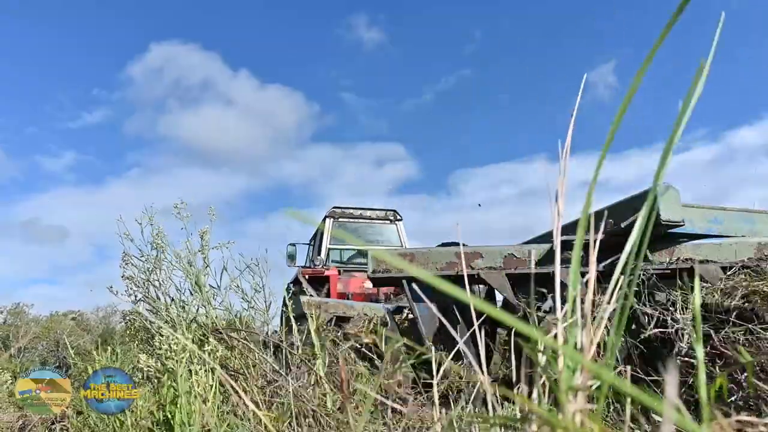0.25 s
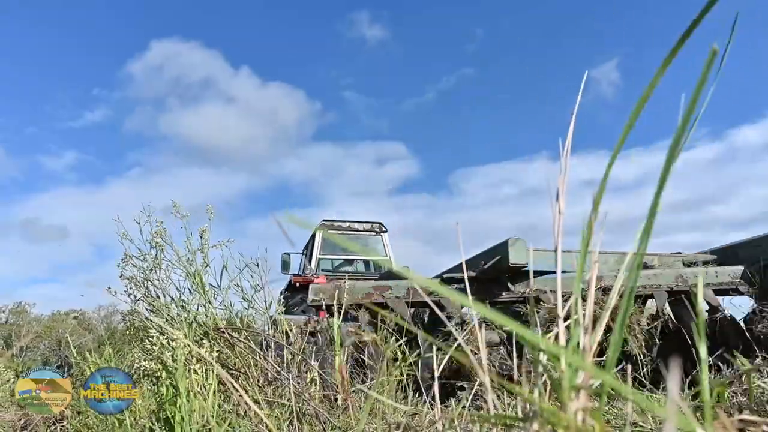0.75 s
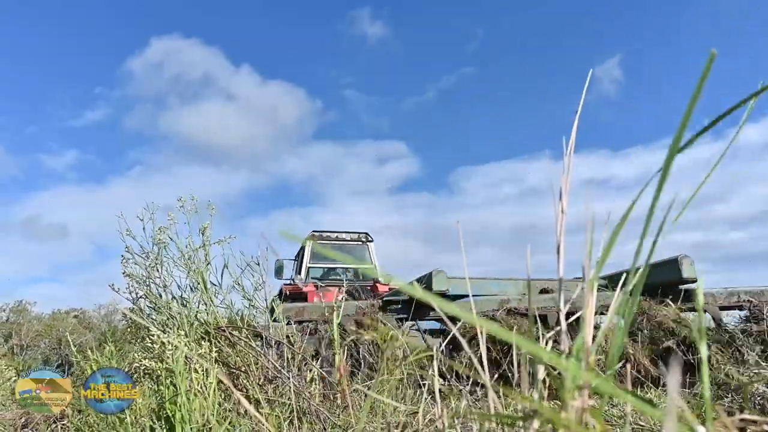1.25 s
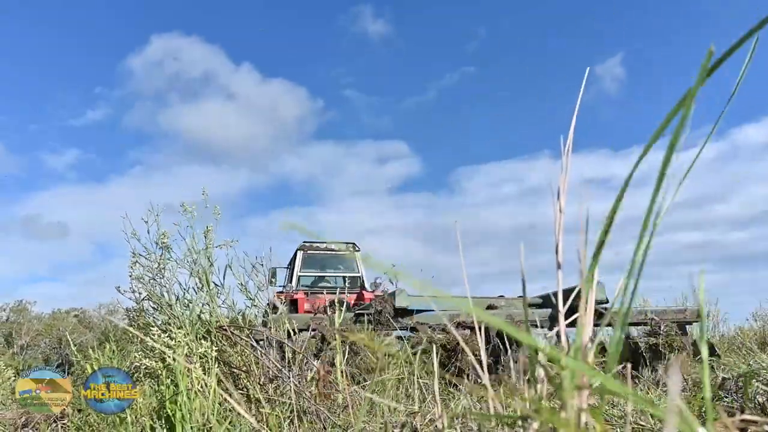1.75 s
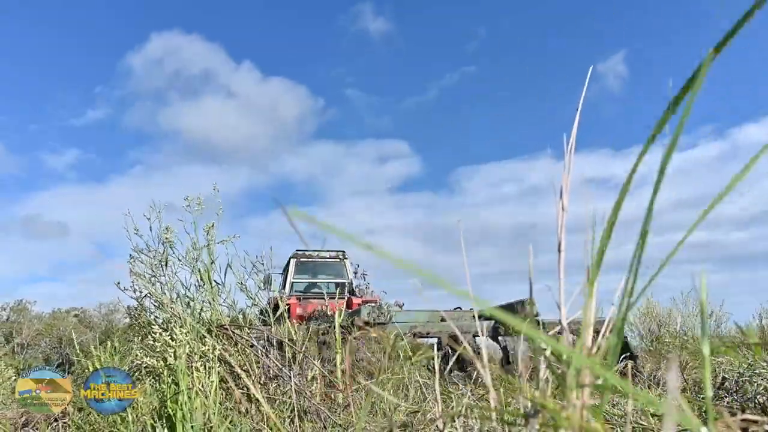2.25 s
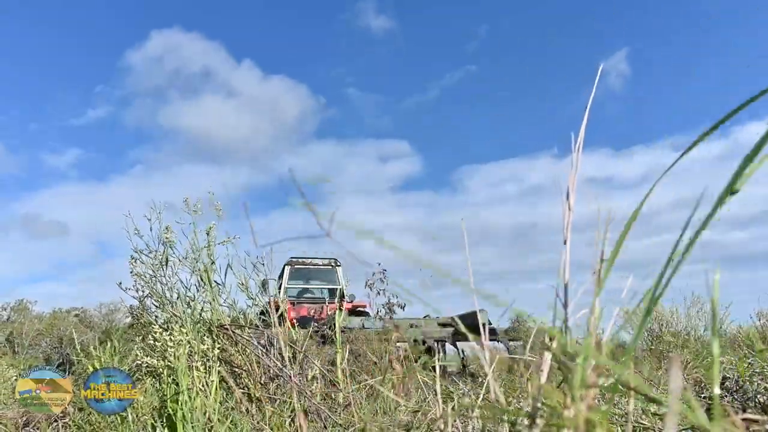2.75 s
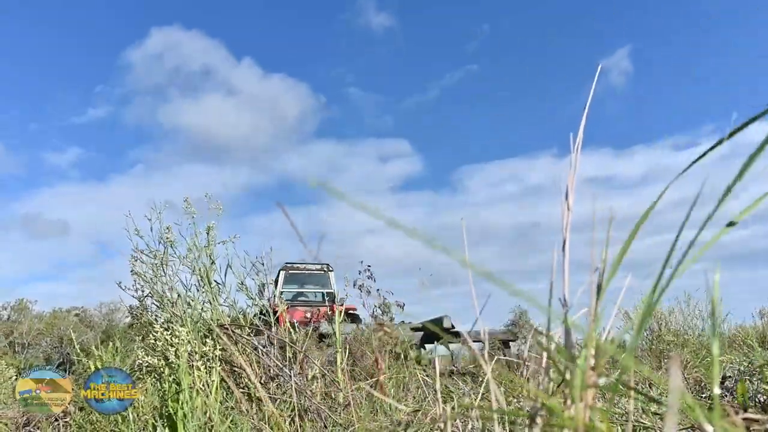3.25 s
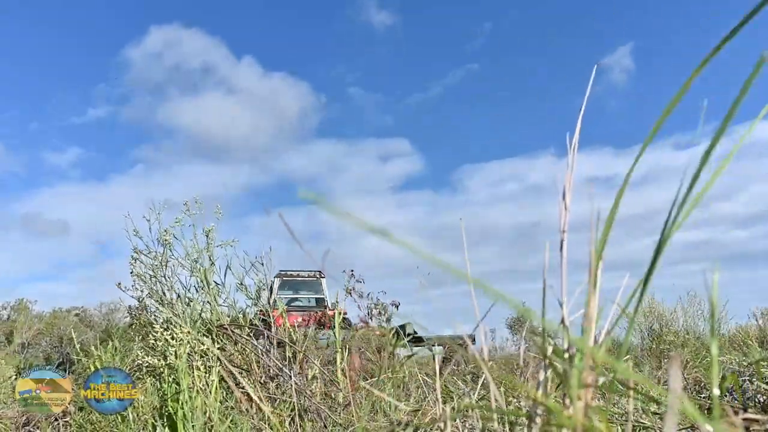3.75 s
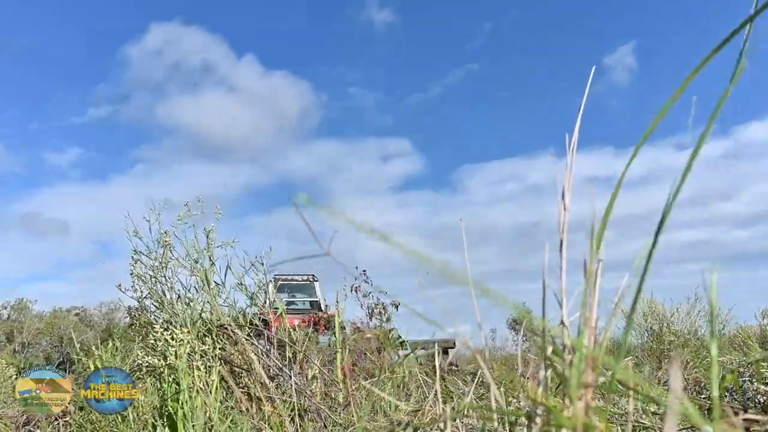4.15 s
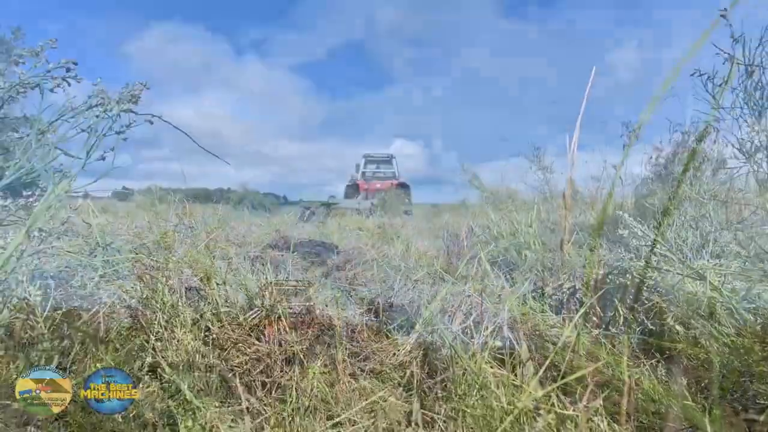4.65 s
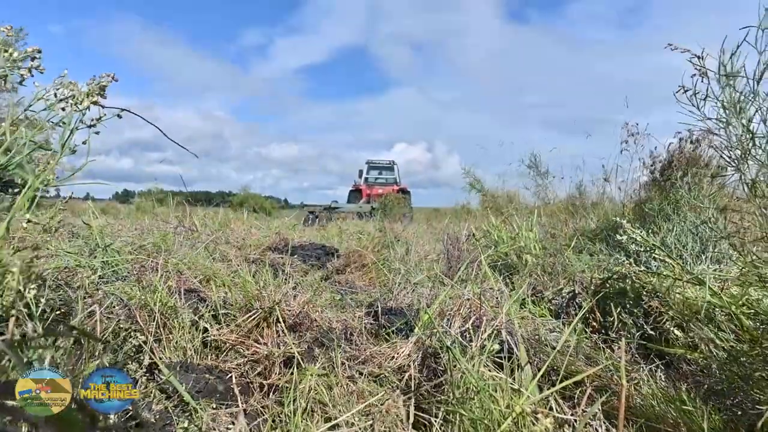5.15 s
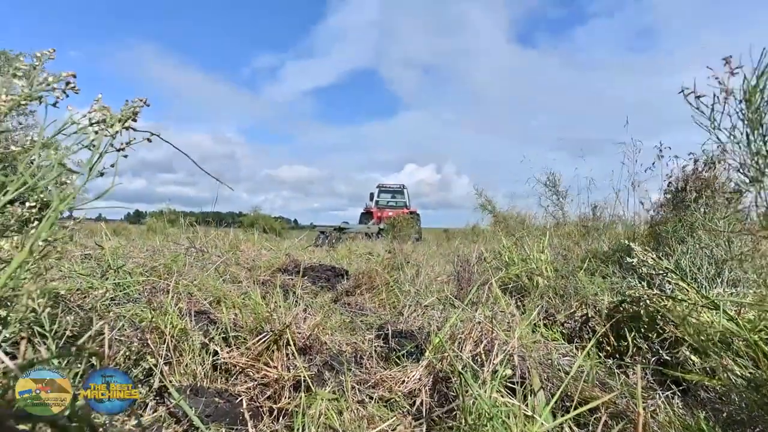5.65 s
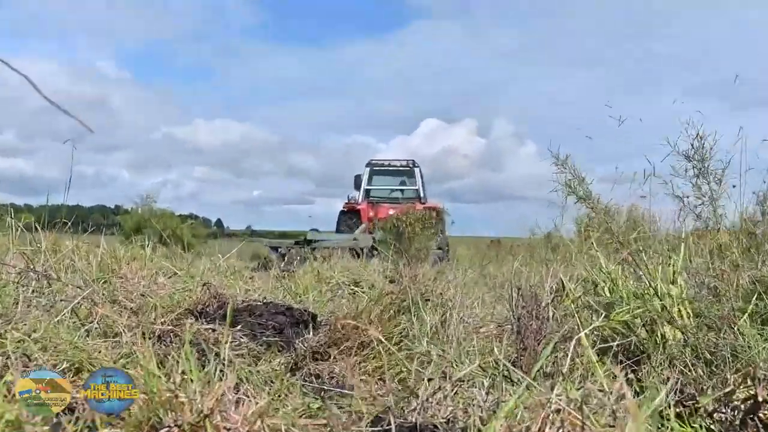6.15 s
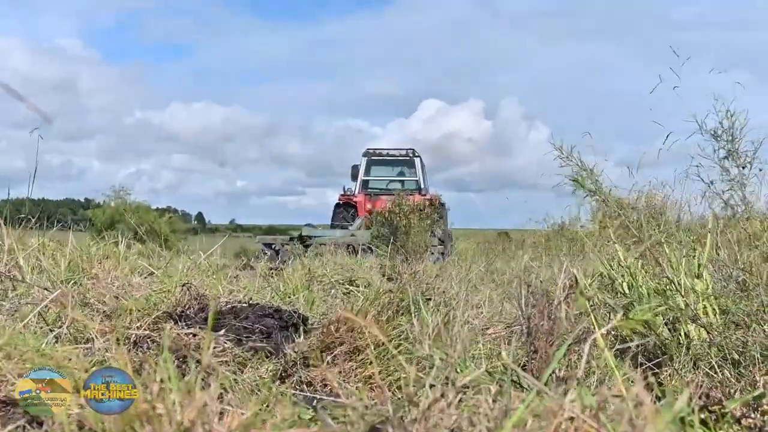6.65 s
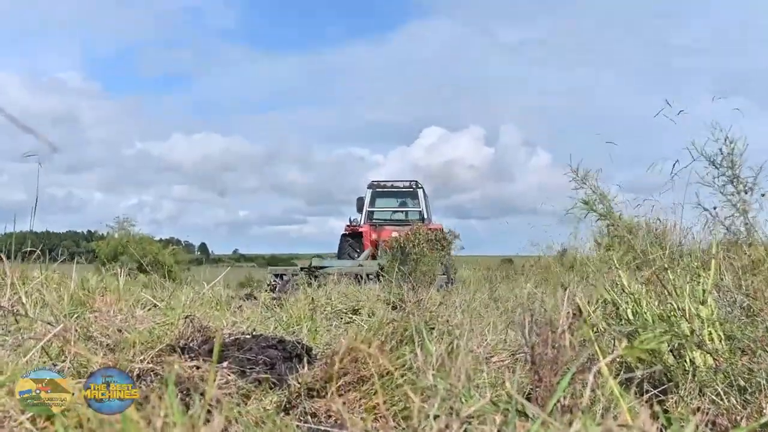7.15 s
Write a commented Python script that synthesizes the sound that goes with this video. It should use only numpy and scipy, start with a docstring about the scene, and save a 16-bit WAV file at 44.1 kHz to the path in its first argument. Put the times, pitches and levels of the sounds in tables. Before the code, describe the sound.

A diesel tractor drones away through a field, its disc harrow crunching soil and stalks, then is heard knocking faintly farther off amid wind buffets.

```python
"""A rough, grassy field: a six-cylinder diesel tractor drags a disc harrow away from the microphones.
Engine tones drone, shaped noise clatters at each firing; random cracks make discs crunch soil and dry stalks.
Struck stones, snapping stalks and bright engine pings ring briefly; then it fades and cuts to a second scene.
It fades back in far off and facing us: crisp knocks flicker, dry grass hisses and
short low noise bursts buffet the microphones."""
import sys
import numpy as np
from scipy import signal
from scipy.fft import rfft, irfft, next_fast_len
from scipy.io import wavfile
from scipy.ndimage import uniform_filter1d, map_coordinates

SR = 44100
rng = np.random.default_rng(int(sys.argv[2]) if len(sys.argv) > 2 else 0)


def wrap_up_sound(samples):
    """Save the sound to the file named by the first command line argument, as 16-bit audio."""
    columns = np.atleast_2d(samples).T
    # keep every value between -1 and 1, then stretch to whole-number steps
    tamed = np.clip(columns, -1, 1)
    steps = np.round(tamed * 32767).astype(np.int16)
    wavfile.write(sys.argv[1], SR, steps)


N = 327222
T = np.arange(N) / SR

# Engine speed before its slight jitter: (time [s], firing rate [Hz])
ENGINE_SPEED = [(0.0, 91.84), (0.5, 90.4), (0.8, 90.6), (1.05, 91.55), (1.4, 90.86), (1.9, 90.1),
                (2.2, 91.47), (2.9, 90.1), (3.45, 90.17), (3.75, 91.33), (4.1, 90.8), (4.5, 90.77),
                (5.4, 90.08), (5.75, 91.93), (6.1, 92.84), (6.5, 91.05), (6.9, 89.8), (7.3, 91.57)]
# Exhaust lines, relative to the drone: (multiple of the six-firing cycle [1], rear [dB], front [dB])
EXHAUST_LINES = [(3, -33, -25), (4, -24, -21), (5, -29, -14), (6, -1, 1), (9, -24, -20), (11, -28.5, -18.5),
                 (12, -26.5, -12.5), (14, -26, -23), (15, -31.5, -25.5), (18, -29.5, -30)]
# Swells of the firing note's octave, from the front: (time [s], lift [dB])
OCTAVE_SWELL = [(5.0, 2), (5.35, -0.5), (5.6, 1.5), (6.28, -19), (6.4, 7.5), (6.5, -0.5), (6.65, 1),
                (7.05, -8), (7.2, 1)]
# Thin whine before its waver: (time [s], pitch [Hz], level [dB])
WHINE_TRACK = [(0.0, 937, -54), (0.09, 935, -52.5), (0.18, 920, -63), (0.72, 919, -64.5),
               (0.98, 928, -58.5), (1.14, 927, -58), (1.24, 919, -66), (2.3, 918, -63.5), (2.9, 917, -69)]
# Injector ring from the front, before its scatter: (time [s], pitch [Hz])
RING_PITCH_TRACK = [(5.0, 3134), (5.45, 3088), (5.85, 2960), (6.2, 3015), (6.55, 3253), (6.95, 3005)]
# Gear mesh tones, relative to the drone: (multiple of the firing rate [1], rear [dB], front [dB])
GEAR_TONES = [(2.8, -22.5, -24.5), (5.06, -35.5, -38), (6.7, -29, -33)]
# Knock of each cylinder in turn, before scatter: (level [dB])
CYLINDER_KNOCK_DB = [4.5, 3, 2.5, 3.5, 4.5, 1]
# Swells of engine treble carried by moving air:
# (time [s], half length [s], lift of the ring [dB], lift of the hiss [dB])
TREBLE_SWELLS = [(2.08, 0.17, 4, 3.5), (2.643, 0.03, -3, 8), (2.872, 0.37, 4.5, 2.5), (3.886, 0.1, -9, -9),
                 (4.126, 0.065, 3.5, -3), (4.282, 0.073, -1, 10), (4.46, 0.14, 9, -11),
                 (4.897, 0.11, 3, 14.5), (5.204, 0.087, 1.5, 2.5), (5.384, 0.12, 2.5, -0.5),
                 (5.616, 0.12, -1, 7.5), (5.791, 0.15, 3.5, 8.5), (6.196, 0.26, -5.5, -10),
                 (6.418, 0.11, 1, 9.5), (6.56, 0.06, 2, 2), (6.72, 0.051, -8, 6), (6.87, 0.097, 5.5, 15),
                 (7.2, 0.044, -1, 11)]
# Short bright pings, mostly near 3 kHz, probably single strong engine knocks and injector rings:
# (time [s], nominal level [dB], pitch [Hz])
ENGINE_PINGS = [(0.08, -38, 1816), (0.717, -37, 2070), (2.742, -46, 3308), (2.83, -46, 3240),
                (2.875, -50, 3150), (2.885, -51, 3030), (2.897, -49, 3050), (2.954, -49, 2950),
                (2.964, -45, 3260), (3.008, -45, 3320), (4.133, -48.5, 3060), (5.18, -43.5, 3020),
                (5.367, -43, 3100), (6.155, -48, 3020), (6.56, -49, 3200)]

# Spectrum shape of the exhaust rumble: (frequency [Hz], relative level per Hz [dB])
RUMBLE_SPECTRUM = [(20, -14), (38, -18), (60, -5.5), (130, 2.5), (200, -2), (260, -8.5), (320, -11),
                   (500, -15), (900, -53.5)]
# Spectrum shape of the clatter from behind: (frequency [Hz], relative level per Hz [dB])
CLATTER_REAR_SPECTRUM = [(250, -17), (400, -6), (620, 5), (780, 4.5), (1050, -7), (1380, -0.5),
                         (1550, -13.5), (1800, 0), (2150, -4), (2290, -9), (2430, -4), (2600, -6),
                         (3400, -8.5), (4200, -14), (5300, -18), (8000, -23), (15000, -55)]
# Spectrum shape of the clatter from the front: (frequency [Hz], relative level per Hz [dB])
CLATTER_FRONT_SPECTRUM = [(300, -28.5), (500, -14.5), (650, 0), (830, 0.5), (950, -1), (1170, 2.5),
                          (1500, -13), (1900, -3), (2400, -12), (4200, -27.5), (7500, -45), (10000, -34.5),
                          (15000, -51)]
# Spectrum shape of discs in soil and stalks: (frequency [Hz], relative level per Hz [dB])
SOIL_SPECTRUM = [(150, -31), (300, -15.5), (420, -1.5), (530, -6.5), (700, -4), (1000, -2), (1500, -1),
                 (2100, -0.5), (3300, -3), (4300, -8), (7000, -16.5), (10000, -21), (12500, -21),
                 (15500, -20)]
# Spectrum shape of wind on the microphones: (frequency [Hz], relative level per Hz [dB])
GUST_SPECTRUM = [(20, 1), (45, 9), (120, 3.5), (250, 1.5), (380, -4.5), (520, -9), (750, -17.5),
                 (1500, -41), (6000, -80)]
# Spectrum shape of dry grass: (frequency [Hz], relative level per Hz [dB])
GRASS_SPECTRUM = [(500, -8), (2500, 11), (5000, 0.5), (9000, -12.5), (12500, -16), (15500, -14)]

# Resonances of harrow frame and discs: (centre [Hz], width [Hz], relative level [dB])
FRAME_MODES = [(520, 210, 5.5), (1430, 70, -1), (1780, 90, -2.5), (2110, 63, 3)]
# Harrow steel when struck: (mode [Hz], relative level before scatter [dB])
STEEL_RINGS = [(1217, 2.5), (1780, -4), (2090, -4), (2440, -1), (2840, -1.5), (3390, -2), (4000, 0),
               (4920, 4)]
# Stones clanking on the discs: (time [s], peak level [dB], pitch that rings most [Hz])
STONE_CLANKS = [(1.9207, -31, 1910), (2.781, -34.5, 3200), (3.142, -40, 1750), (3.2315, -38, 1600),
                (3.5937, -39.5, 2440)]
# Stalks snapping and stones ticking, before lift and panning: (time [s], peak level [dB], centre [Hz])
STALK_SNAPS = [(0.1444, -37, 2960), (0.804, -35.5, 2160), (1.0794, -47, 5000), (1.5476, -37, 3380),
               (2.1143, -43, 3420)]
# Buffets on the microphones: (time [s], level at the peak [dB], half length [s], centre [Hz])
WIND_BUFFETS = [(2.84, -42.5, 0.04, 190), (4.964, -58, 0.01, 230), (5.065, -48.5, 0.059, 220),
                (5.163, -39.5, 0.016, 201), (5.214, -41, 0.007, 352), (5.24, -44, 0.007, 280),
                (5.316, -45.5, 0.012, 180), (5.711, -40, 0.022, 260), (5.766, -37.5, 0.015, 260),
                (5.808, -37.5, 0.022, 290), (5.916, -36.5, 0.0086, 170), (5.971, -38.5, 0.0059, 240),
                (5.995, -37, 0.008, 350), (6.05, -37, 0.008, 250), (6.116, -42.5, 0.0087, 230),
                (6.143, -40, 0.0048, 320), (6.182, -39, 0.0055, 190), (6.214, -44, 0.015, 340),
                (7.07, -49, 0.0048, 280), (7.155, -48, 0.011, 160), (7.17, -45, 0.005, 210),
                (7.176, -50, 0.0032, 450), (7.191, -47.5, 0.008, 191), (7.23, -47.5, 0.0076, 250),
                (7.293, -45, 0.002, 520), (7.33, -48, 0.007, 170)]

# The machine sinks towards the cut to the far, front view and comes back after it
CUT_S, FADE_OUT_S, FADE_IN_S, FADE_DB = 4.75, 0.53, 0.42, -15
# Driving away, and distances from the microphones at the start
DRIVE_M_S, ENGINE_M, HARROW_M = 1.36, 10.1, 1.77
# Levels from behind at the start, before wavers and lifts
REAR_DRONE_DB, REAR_CLATTER_DB, REAR_RING_DB, REAR_HISS_DB, HARROW_DB = -31.5, -51.5, -57.5, -62, -42.5
UNMASK_DB_PER_S = 0.53  # the harrow's frame shields the engine's clatter less and less
# Levels from the front, before wavers and lifts
FRONT_DRONE_DB, FRONT_CLATTER_DB, FRONT_RING_DB, FRONT_HISS_DB, GRASS_DB = -40.5, -50, -55.5, -67, -58.5
# The far clatter rises to a rounded peak and sinks away
LOUDEST_S, ARC_DB_PER_S2 = 5.28, 2
REAR_RUMBLE_DB, FRONT_RUMBLE_DB = -14.5, -16.5  # relative to the drone
KNOCK_SCATTER_DB = 1.4
TOP_HZ = 15800


def exhaust(cycle, front):
    """The firing note and octave, with weak lines from unequal cylinders, over rumble that puffs at firings."""
    out = 0
    for order, rear_db, front_db in EXHAUST_LINES:
        waver_db = 0.45 * walk(22) if order == 6 else 2.4 * walk(12)
        drift_turns = 0 if order % 6 == 0 else 0.06 * walk(10)
        line = np.sin(2 * np.pi * (order * cycle + drift_turns + rng.random()))
        swell_db = curves(OCTAVE_SWELL)[0] if order == 12 else 0
        level_db = np.where(front, front_db + swell_db, rear_db) + waver_db
        out = out + np.sqrt(2) * line * undb(level_db)
    puffs = rng.standard_normal(N) * knocks(cycle, decay_strokes=0.25, steady=0.95)
    rumble = colour(puffs, RUMBLE_SPECTRUM)
    return out + rumble * undb(np.where(front, FRONT_RUMBLE_DB, REAR_RUMBLE_DB))


def gears(cycle, front):
    """Meshing teeth sing at fixed multiples of the engine speed, unsteady from backlash."""
    firing = len(CYLINDER_KNOCK_DB) * cycle
    out = 0
    for multiple, rear_db, front_db in GEAR_TONES:
        turns = multiple * firing + 0.18 * walk(24)
        level_db = np.where(front, front_db, rear_db) + 3.15 * walk(6)
        out = out + np.sqrt(2) * np.sin(2 * np.pi * turns) * undb(level_db)
    return out


def whine():
    """A thin, wavering mechanical sine, heard until the cut; its pitch is mostly higher in the swells."""
    hz, db = curves(WHINE_TRACK)
    turns = np.cumsum(hz + 3.86 * walk(24.8)) / SR
    return np.sqrt(2) * np.sin(2 * np.pi * turns) * undb(db + 1.3 * walk(24.2)) * (T < CUT_S)


def knocks(cycle, decay_strokes, steady):
    """Envelope: a burst at each firing swells and dies within the stroke, over steady mechanical noise."""
    firing = len(CYLINDER_KNOCK_DB) * cycle
    count, phase = firing.astype(int), firing % 1
    scatter_db = KNOCK_SCATTER_DB * rng.standard_normal(N // 100)[count]
    size_db = np.take(CYLINDER_KNOCK_DB, count, mode="wrap") + scatter_db
    burst = phase / decay_strokes * np.exp(1 - phase / decay_strokes)
    return unit(steady + undb(size_db) * burst)


def injection_rings(cycle, hz, scatter=0.05, decay_strokes=0.25):
    """Each injection strikes a brief, clean ring, every time at a slightly different pitch."""
    firing = len(CYLINDER_KNOCK_DB) * cycle
    detune, start = rng.standard_normal((N // 100, 2))[firing.astype(int)].T
    turns = np.cumsum(hz * (1 + scatter * detune)) / SR + start
    stroke = np.sin(np.pi * (firing % 1))  # silent where the pitch jumps
    return unit(np.sin(2 * np.pi * turns) * knocks(cycle, decay_strokes, 0) * stroke)


def block_rear(cycle, ring_db, hiss_db):
    """Diesel clatter from behind, blurred by cab and grass; each part of the block rattles in its own way."""
    body = knocks(cycle, decay_strokes=0.28, steady=0.9)
    valves = knocks(cycle, decay_strokes=0.28, steady=0.9)
    injectors = knocks(cycle, decay_strokes=0.25, steady=0.3)
    clatter = colour(body * stereo_noise(0.067), CLATTER_REAR_SPECTRUM)
    clatter = clatter * undb(REAR_CLATTER_DB + UNMASK_DB_PER_S * T)
    rough_ring = unit(resonate(injectors * stereo_noise(0.13), 3080, 1500))
    ring = unit(rough_ring + undb(-1) * injection_rings(cycle, 3230))
    ring = ring * undb(REAR_RING_DB + ring_db + 0.97 * walk(22.9))
    hiss = unit(resonate(valves * stereo_noise(0.12), 5180, 1120))
    hiss = hiss * undb(REAR_HISS_DB + hiss_db + 1.25 * walk(16))
    return (clatter + ring + hiss) * receding(ENGINE_M)


def block_front(cycle, ring_db, hiss_db):
    """Crisp knock from the front, valves just after each firing; moving air makes the treble swell and flicker."""
    body = knocks(cycle, decay_strokes=0.22, steady=1.0)
    injectors = knocks(cycle, decay_strokes=0.19, steady=0.094)
    valves = knocks(cycle - 0.015, decay_strokes=0.19, steady=0.073)  # lag in engine cycles
    clatter = colour(body * stereo_noise(0.28), CLATTER_FRONT_SPECTRUM) * undb(FRONT_CLATTER_DB)
    rough_ring = unit(resonate(injectors * stereo_noise(0.3), 2970, 1100))
    clean_ring = injection_rings(cycle, curves(RING_PITCH_TRACK)[0], scatter=0.045, decay_strokes=0.18)
    ring = unit(rough_ring + undb(0.5) * clean_ring)
    ring = ring * undb(FRONT_RING_DB + ring_db + 0.56 * walk(5.7))
    low_hiss = resonate(valves * stereo_noise(0.17), 5130, 1500)
    high_hiss = resonate(valves * stereo_noise(0.29), 5980, 1250)
    hiss = unit(low_hiss + high_hiss) * undb(FRONT_HISS_DB + hiss_db + 1.8 * walk(33))
    arc_db = -ARC_DB_PER_S2 * (T - LOUDEST_S) ** 2
    return (clatter + ring + hiss) * undb(arc_db)


def swells():
    """Lifts in dB of the injectors' ring and of the hiss: moving air gives a smooth hump for each swell."""
    lifts = np.zeros((2, N))
    for s, length_s, ring_db, hiss_db in TREBLE_SWELLS:
        lifts += np.outer([ring_db, hiss_db], np.exp(-((T - s) / length_s) ** 2))
    return lifts


def engine_pings(attack_s=0.0013, decay_s=0.0046, rough=0.51):
    """Short bright pings, probably single strong engine knocks and injector rings: a sine with narrow noise."""
    out, t = np.zeros(N), T[:SR // 10]
    shape = (1 - np.exp(-t / attack_s)) * np.exp(-t / decay_s)
    for s, db, hz in ENGINE_PINGS:
        narrow_noise = unit(resonate(rng.standard_normal(len(t)), hz, hz / 5))
        ring = np.sin(2 * np.pi * hz * t) + rough * narrow_noise
        out[int(s * SR):int(s * SR) + len(t)] += ring * shape / shape.max() * undb(db)
    return out


def harrow(grains_per_s=2500, spread=0.43, dulling_db_per_s=1.5):
    """Discs shear soil and stalks: countless tiny cracks over a steady scrape, duller as they drive off."""
    cracks = unit((rng.random((2, N)) < grains_per_s / SR) * rng.standard_normal((2, N)))
    scrape = rng.standard_normal((2, N))
    mid, side = colour((cracks + scrape) * undb(1.48 * walk(44.64)), SOIL_SPECTRUM)
    side = spread * signal.sosfilt(signal.butter(2, 1400, "high", fs=SR, output="sos"), side)
    both = np.array([mid + side, mid - side])
    low = signal.sosfiltfilt(signal.butter(1, 5000, fs=SR, output="sos"), both)
    # close by on the right, where the camera body shades the left microphone's treble
    treble = (both - low) * panned(-4.5) * undb(-dulling_db_per_s * T)
    return (low * panned(-0.048) + treble) * undb(HARROW_DB) * receding(HARROW_M)


def frame(knocks_per_s=450, level_db=-46.0, fade_db_per_s=8.0):
    """Clods drum thickly on steel frame and discs, which ring briefly; soon lost as the harrow leaves."""
    out = 0
    for hz, width_hz, db in FRAME_MODES:
        clods = unit((rng.random(N) < knocks_per_s / SR) * rng.standard_normal(N))
        drumming = clods + 0.5 * stereo_noise(0.49)
        out = out + undb(db + 2 * walk(20)) * resonate(drumming, hz, width_hz)
    return unit(out) * undb(level_db - fade_db_per_s * T)


def from_right(x, lag_s=0.000084):
    """A source on the right reaches the left microphone late, less so far off; treble is too diffuse to show it."""
    low = signal.sosfiltfilt(signal.butter(2, 4000, fs=SR, output="sos"), x[0])
    heard_at = (T - lag_s * receding(HARROW_M)) * SR
    late = map_coordinates(low, [heard_at], order=1, mode="mirror")
    return np.array([x[0] - low + late, x[1]])


def clanks(attack_s=0.00041, decay_s=0.0089, reach_octaves=1.0, scatter_db=2.0, rough=0.3):
    """A stone strikes a disc: a few steel modes ring, damped at once by the soil."""
    out, t = np.zeros(N), T[:SR // 10]
    hz, db = np.transpose(STEEL_RINGS)
    shape = (1 - np.exp(-t / attack_s)) * np.exp(-t / decay_s)
    for s, peak_db, centre_hz in STONE_CLANKS:
        size, start = rng.standard_normal((2, len(hz)))
        nearness = np.exp(-(np.log2(hz / centre_hz) / reach_octaves) ** 2)
        weight = undb(db + scatter_db * size) * nearness
        ring = unit(weight @ np.sin(2 * np.pi * (np.outer(hz, t) + start[:, None])))
        contact = unit(resonate(rng.standard_normal(len(t)), 4200, 4300))
        hit = (ring + rough * contact) * shape
        out[int(s * SR):int(s * SR) + len(t)] += hit / np.abs(hit).max() * undb(peak_db)
    return out


def snaps(decay_s=0.0063, spread=0.37, lift_db=3.5):
    """Stalks snap and stones tick: short bursts of contact noise, each with a broad resonance of its own."""
    out, t, noise = np.zeros((2, N)), T[:SR // 10], stereo_noise(spread)
    for s, db, hz in STALK_SNAPS:
        span = slice(int(s * SR), int(s * SR) + len(t))
        hit = resonate(noise[:, span] * np.exp(-t / decay_s), hz, width_hz=hz)
        out[:, span] += hit / np.abs(hit).max() * undb(db)
    return out * undb(lift_db) * panned(-1.4)


def wind(flutter_db=-14.5, flutter_s=0.064, rel_width=3.2):
    """Eddies thump on the microphones one by one, each with its own depth, in a longer, weaker flutter."""
    eddies = colour(stereo_noise(0.2, apart_hz=316) * undb(0.62 * walk(70)), GUST_SPECTRUM)
    out, flutter_power = np.zeros((2, N)), np.zeros(N)
    for s, db, length_s, hz in WIND_BUFFETS:
        span = slice(int(s * SR) - SR // 4, int(s * SR) + SR // 4)
        shape = np.exp(-((T[span] - s) / length_s) ** 2 / 2)
        thump = resonate(eddies[:, span] * shape, hz, rel_width * hz)
        out[:, span] += unit(thump) * np.sqrt(np.mean(shape ** 2)) * undb(db)
        around = np.exp(-((T[span] - s) / flutter_s) ** 2)
        flutter_power[span] += undb(2 * (db + flutter_db)) * around
    flutter = colour(stereo_noise(0.1, apart_hz=288), GUST_SPECTRUM) * np.sqrt(flutter_power)
    return out + flutter


def grass():
    """Dry blades near the microphones brush each other faintly: fluttering, shaped noise."""
    blades = colour(stereo_noise(0.19) * undb(2.66 * walk(250)), GRASS_SPECTRUM)
    return blades * undb(GRASS_DB + 1.2 * walk(5.2))


def receding(start_m):
    """Gain of a source that drives away from start_m: it falls with distance."""
    return start_m / (start_m + DRIVE_M_S * T)


def fade():
    """Gain that sinks evenly in dB towards the cut and comes back after it."""
    depth = np.interp(T, [CUT_S - FADE_OUT_S, CUT_S, CUT_S + FADE_IN_S], [0, 1, 0])
    return undb(FADE_DB * depth)


def undb(db):
    """Decibels to gain."""
    return 10 ** (np.asarray(db) / 20)


def unit(x):
    """Scale to rms 1."""
    return x / np.sqrt(np.mean(x ** 2))


def curves(table):
    """Each column of a table as a line through time."""
    s, *columns = np.transpose(table)
    return [np.interp(T, s, c) for c in columns]


def colour(x, points):
    """Give a sound the spectrum of (Hz, dB) points at rms near 1, without ringing ahead of its clicks."""
    hz, db = np.transpose(points)
    size = next_fast_len(N + SR // 10, real=True) // 2 * 2
    f = np.maximum(np.arange(size // 2 + 1) * SR / size, 1)
    # keeping the cepstrum's first half makes the filter minimum phase
    cepstrum = irfft(np.log(undb(np.interp(np.log(f), np.log(hz), db))))
    cepstrum[size // 2:] = 0
    response = np.exp(2 * rfft(cepstrum))
    return unit(irfft(rfft(x, size) * response)[..., :N])


def resonate(x, hz, width_hz):
    """A resonance with steep skirts: the same peak filter twice."""
    b, a = signal.iirpeak(min(hz, SR * .45), hz / width_hz, SR)
    return signal.lfilter(b, a, signal.lfilter(b, a, x))


def walk(rate):
    """Smooth chance with spread near 1, from rate random steps a second."""
    k = int(SR / rate)
    steps = np.repeat(rng.standard_normal(N // k + 1), k)
    return 1.3 * uniform_filter1d(uniform_filter1d(steps, k), k)[:N]


def stereo_noise(spread, apart_hz=1800):
    """White noise whose treble differs between left and right; the bass is shared."""
    mid, side = rng.standard_normal((2, N))
    side = spread * signal.sosfilt(signal.butter(2, apart_hz, "high", fs=SR, output="sos"), side)
    return np.array([mid + side, mid - side])


def panned(db):
    """Left and right gains for a left minus right level."""
    return undb(np.array([[db], [-db]]) / 2)


def scene():
    """One crankshaft drives exhaust, gears and block; discs and frame are heard only before the cut."""
    firing_hz = curves(ENGINE_SPEED)[0] * (1 + .002 * walk(15))
    cycle = np.cumsum(firing_hz) / SR / len(CYLINDER_KNOCK_DB)
    front = T >= CUT_S
    drone_gain = np.where(front, undb(FRONT_DRONE_DB), undb(REAR_DRONE_DB) * receding(ENGINE_M))
    drone = (exhaust(cycle, front) + gears(cycle, front)) * drone_gain
    lifts = swells()
    near = block_rear(cycle, *lifts) + from_right(harrow() + frame())
    far = block_front(cycle, *lifts) + grass()
    faded = (drone + np.where(front, far, near) + whine()) * fade()
    return faded + engine_pings() + snaps() + clanks() + wind()


def record(dry, widen=1.0):
    """The camera widens the treble between its two microphones and cuts the top."""
    treble = signal.butter(2, 2600, "high", fs=SR, output="sos")
    side = widen * signal.sosfiltfilt(treble, (dry[0] - dry[1]) / 2)
    wide = dry + np.array([side, -side])
    return signal.sosfilt(signal.ellip(10, .2, 80, TOP_HZ, fs=SR, output="sos"), wide)


dry = scene()
out = record(dry)
wrap_up_sound(out)
```